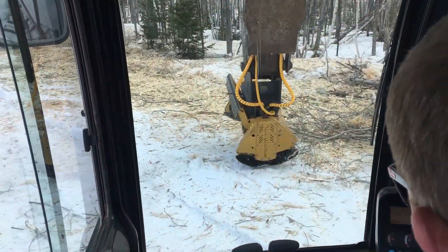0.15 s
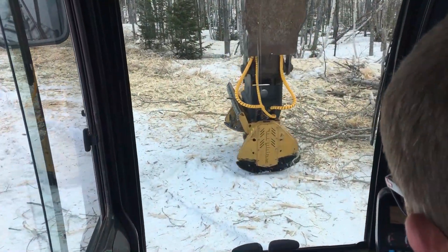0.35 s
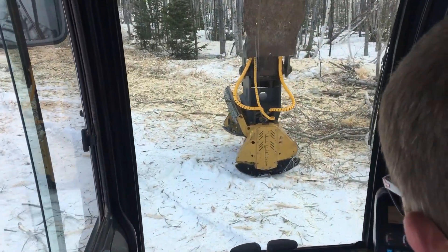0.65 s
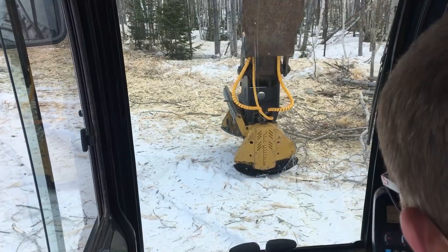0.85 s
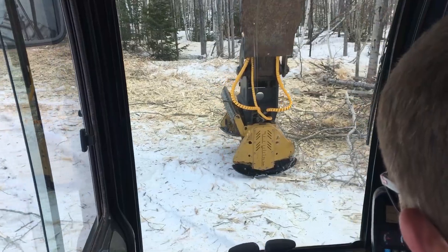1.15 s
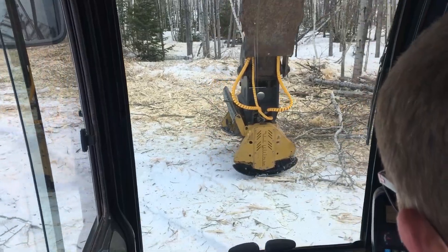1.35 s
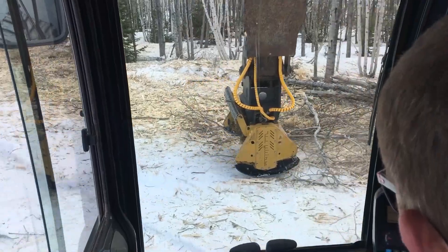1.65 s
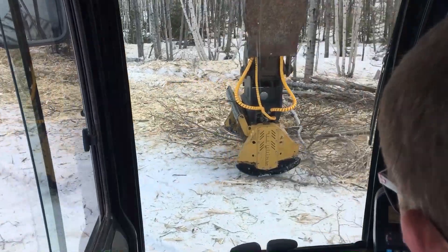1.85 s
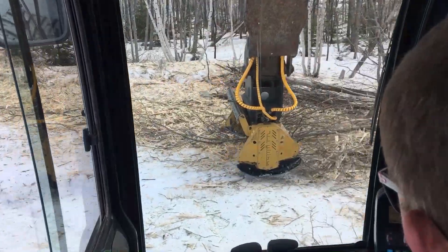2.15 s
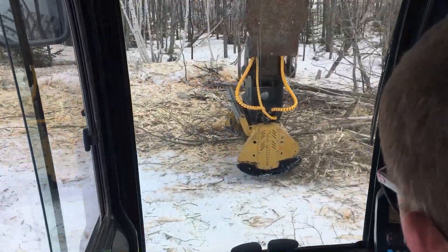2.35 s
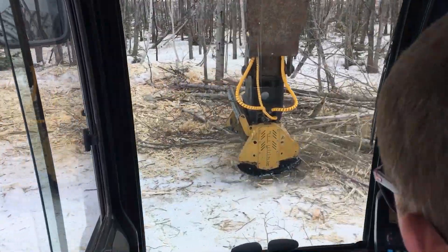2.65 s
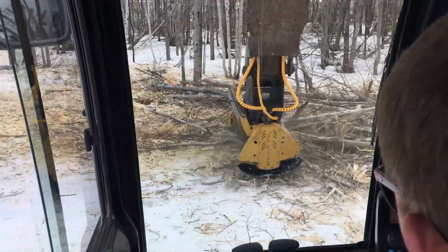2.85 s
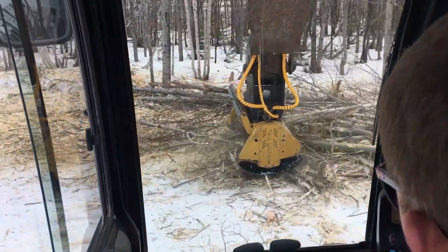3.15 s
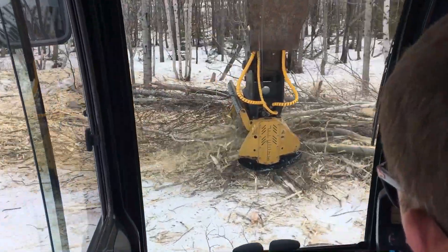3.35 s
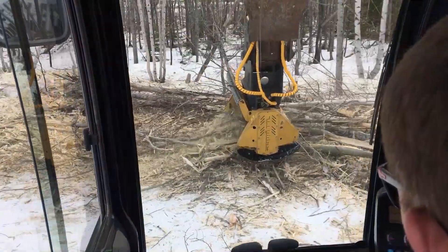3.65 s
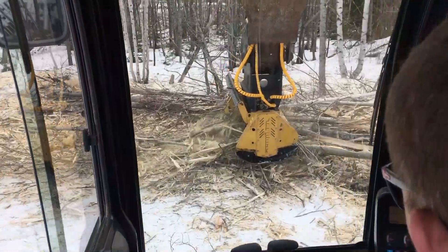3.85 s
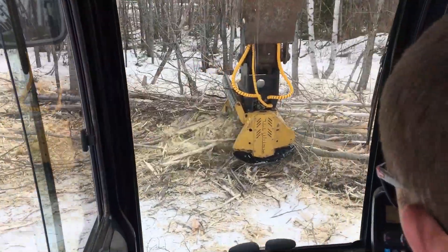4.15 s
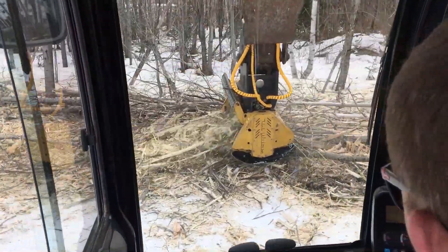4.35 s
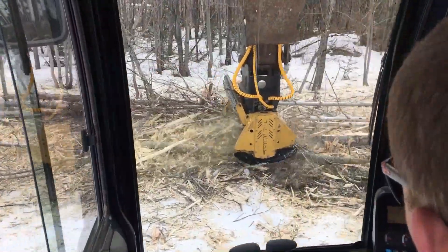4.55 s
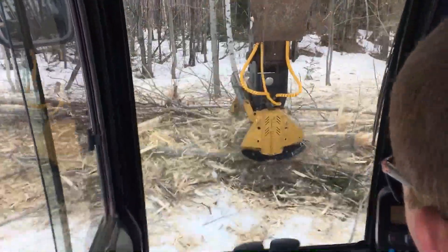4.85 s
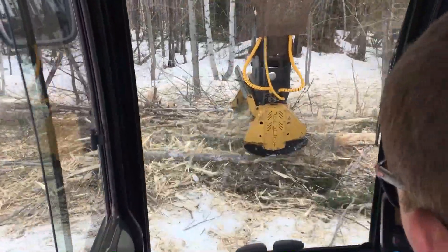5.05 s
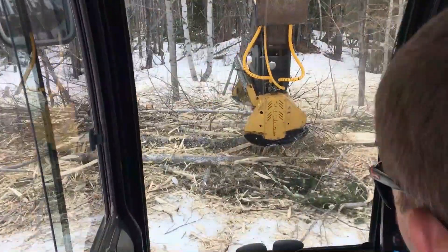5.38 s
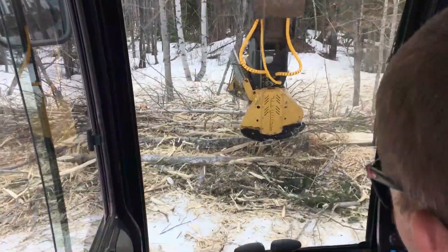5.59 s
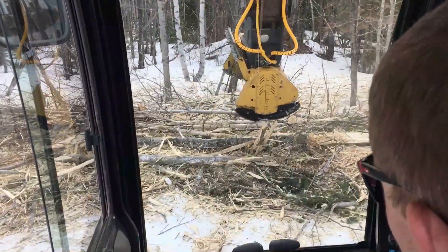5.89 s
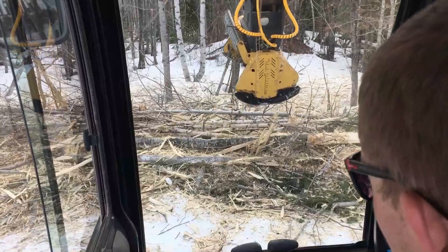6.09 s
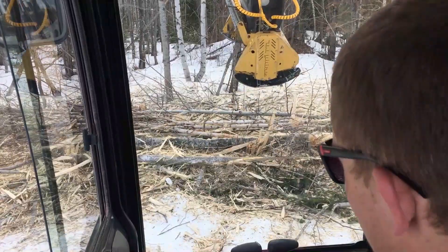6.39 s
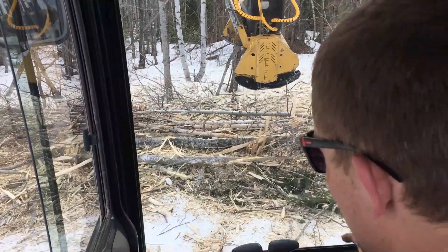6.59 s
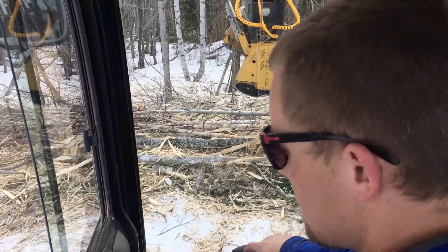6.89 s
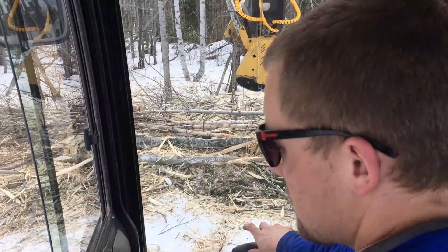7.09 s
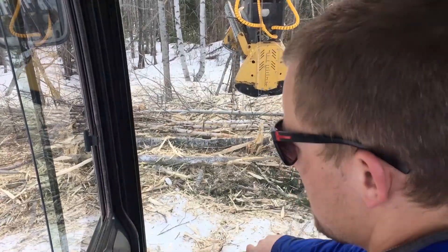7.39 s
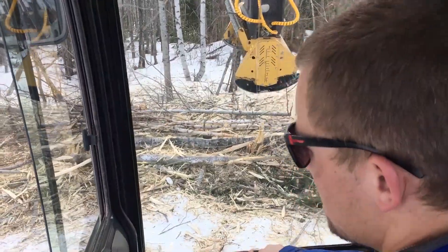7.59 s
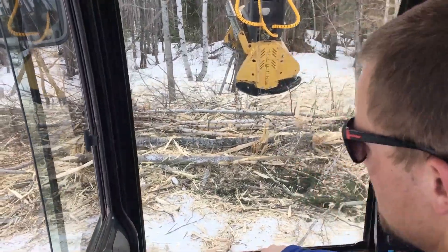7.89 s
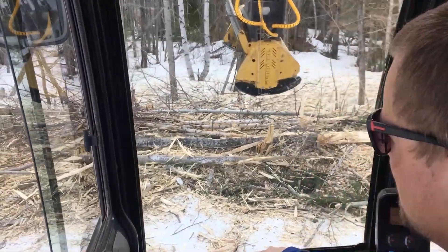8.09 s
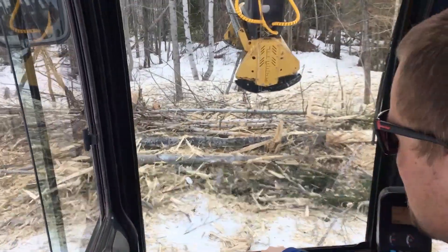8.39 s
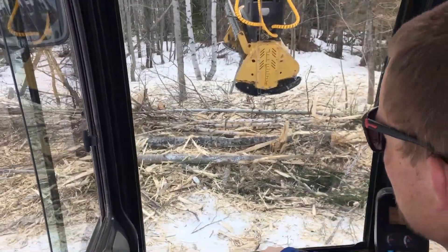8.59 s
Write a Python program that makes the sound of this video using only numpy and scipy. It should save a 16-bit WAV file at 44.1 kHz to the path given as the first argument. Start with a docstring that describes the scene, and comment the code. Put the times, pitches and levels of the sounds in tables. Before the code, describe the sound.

Inside an excavator cab, a diesel engine booms low while a mulcher head outside cracks and shreds brush, then stops as loose fittings rattle.

```python
"""A diesel engine booms in the cab of an excavator sweeping a mulcher head through brush; heard from the seat.
The engine is harmonics of its firing rate, which sags under load, plus weaker crankshaft and pump lines.
Out beyond the glass, teeth shred wood: dense random cracks and hard chops, dulled and ringing in steel.
Hydraulics whine, whistle and hiss; filtered noise rocks the cab at each jolt and drones in its panels.
Close by are sharp ticks made of short decaying sines, and rattles, knocks and a squeak."""
import sys
import numpy as np
from scipy import signal
from scipy.fft import rfft, irfft, next_fast_len
from scipy.io import wavfile
from scipy.ndimage import map_coordinates

SR = 44100
rng = np.random.default_rng(int(sys.argv[2]) if len(sys.argv) > 2 else 0)


def unload_wav(signal):
    """Save mono or channel-first audio to the path in sys.argv[1] as 16-bit WAV at rate SR, clipped to [-1, 1]."""
    wavfile.write(
        sys.argv[1],
        SR,
        np.round(np.clip(np.atleast_2d(signal).T, -1, 1) * 32767).astype(np.int16),
    )


N = 384993


def amp(db):
    """Decibels to gain."""
    return 10 ** (np.asarray(db) / 20)


def unit(x):
    """Scale to rms 1."""
    return x / np.sqrt(np.mean(x ** 2) + 1e-20)


def curves(rows):
    """One value per sample for each column after the time."""
    s, *columns = np.transpose(rows)
    return [np.interp(np.arange(N) / SR, s, column) for column in columns]


def wobble(rate):
    """A smooth random curve, rate knots a second."""
    knots = rng.standard_normal(4096)
    coarse = np.arange(0, N + 64, 64)
    values = map_coordinates(knots, [coarse * rate / SR], mode="wrap")
    return np.interp(np.arange(N), coarse, values)


def filtered(x, response):
    """Multiply the spectrum of x by a complex response of frequency."""
    m = next_fast_len(N + SR // 4)  # spare room for the ringing
    return irfft(rfft(x, m) * response(np.fft.rfftfreq(m, 1 / SR)), m)[:N]


def colour(points):
    """Response through (frequency [Hz], level [dB]) points on a log frequency axis."""
    f, db = np.transpose(points)
    return lambda hz: amp(np.interp(np.log(hz + 1), np.log(f), db))


def body(modes):
    """Causal response of resonances with alternating sign: (centre [Hz], width [Hz], level [dB])."""
    def response(f):
        total = 0
        for k, (centre, width, db) in enumerate(modes):
            damping = 1j * f * width
            total = total + (-1) ** k * amp(db) * damping / (centre * centre - f * f + damping)
        return total
    return response


def noise(response):
    """Noise of rms 1 with the given response."""
    return unit(filtered(rng.standard_normal(N), response))


def tone(hz):
    """A sine of rms 1 that follows a frequency curve."""
    return np.sqrt(2) * np.sin(2 * np.pi * (np.cumsum(hz) / SR + rng.random()))


def bursts(times, levels_db, attack, t60):
    """Envelope of blows that rise quickly and die away by 60 dB in about t60 seconds."""
    out, t = np.zeros(N + 2 * SR), np.arange(SR) / SR
    shape = (1 - np.exp(-t / attack)) * np.exp(-np.log(1000) * t / t60)
    for s, db in zip(times, levels_db):
        out[round(s * SR):][:len(t)] += amp(db) * shape / shape.max()
    return out[:N]


def swells(rows, attack_s, release_s):
    """Envelope of (start [s], length [s], level [dB]) rows: a smooth rise, a hold, a fade after the end."""
    t = np.arange(N) / SR
    envelope = np.zeros(N)
    for start, length, db in rows:
        rise = np.sin(np.pi / 2 * np.clip((t - start) / attack_s, 0, 1)) ** 2
        fade = np.exp(-np.maximum(t - start - length, 0) / release_s)
        envelope += amp(db) * rise * fade
    return envelope


def lines(shaft_hz, orders, waver_db, waver_rate):
    """Tones locked to a shaft, each wavering in strength."""
    return sum(amp(db + waver_db * wobble(waver_rate)) * tone(order * shaft_hz) for order, db in orders)


def machine_hiss(firing_hz, level_db, depth=0.043, ring_db=-5):
    """Fan and oil noise with a few narrow resonances, pulsing slightly with each firing."""
    # spectrum of the rush: (frequency [Hz], level [dB per Hz])
    hiss_spectrum = [(500, -16), (1200, -2), (1700, -5), (2300, -1), (3200, -3), (3900, -7), (5000, -14.5),
                     (6300, -21.5), (7600, -26), (10400, -29.5), (11800, -26), (15500, -31)]
    # resonances in the hiss: (centre [Hz], width [Hz], level [dB])
    machine_modes = [(1590, 90, -2), (1865, 50, 0), (2100, 60, 0), (2250, 60, -1), (2645, 70, 4),
                     (3470, 200, -4)]
    ringing = noise(lambda hz: body(machine_modes)(hz) * colour(hiss_spectrum)(hz))
    rush = noise(colour(hiss_spectrum)) + amp(ring_db) * ringing
    pulsing = unit((1 + depth * tone(firing_hz)) * rush)
    return amp(level_db + 1.1 * wobble(25)) * pulsing


def cab(groan_db, groan_to_panels_db=-27, boom_follows=0.45, drone_follows=0.2):
    """The cab rocks after each jolt and booms a little more; its panels drone with machine and groaning head."""
    # jolts that rock the cab on its mounts: (time [s], level [dB])
    jolts = [(.78, -24.5), (3.1, -25.5), (3.97, -21.5), (4.88, -19), (5.09, -17), (5.33, -23.5),
             (6.301, -36), (6.72, -17), (7.58, -24), (7.95, -21), (8.2, -17), (8.471, -19.5)]
    # spectra of rocking cab, booming air and droning panels: (frequency [Hz], level [dB per Hz])
    shake_spectrum = [(14, -49), (22, -22), (32, -4.5), (45, 1.5), (62, -3), (90, -5), (140, -19),
                      (300, -50), (600, -100)]
    boom_spectrum = [(25, -32.5), (55, -13), (85, 4.5), (120, 0.5), (165, 1.5), (210, -3.5), (270, -10.5),
                     (340, -18), (450, -23), (800, -69.5)]
    drone_spectrum = [(100, -1.5), (250, 17), (390, 10), (500, 5), (760, 3.5), (1000, -1), (1400, -9),
                      (2000, -18), (5000, -57)]
    shake_db, boom_db, drone_db = -28, -27, -36  # steady levels between jolts
    s, jolt_db = np.transpose(jolts)
    rocking = np.hypot(1, bursts(s, jolt_db - shake_db, attack=.05, t60=.75))
    shake = amp(shake_db) * rocking * noise(colour(shake_spectrum))
    boom = amp(boom_db) * rocking ** boom_follows * noise(colour(boom_spectrum))
    drone_level = amp(drone_db + 0.81 * wobble(5)) * rocking ** drone_follows
    drone_level = drone_level + amp(groan_db + groan_to_panels_db)
    return shake + boom + drone_level * noise(colour(drone_spectrum))


def drive(start, length, db, full_hz):
    """A hydraulic drive's whine climbs in pitch and level as it spins up."""
    spin_up_s, spin_up_share = .3, .075  # it starts this share below its full pitch
    age = np.maximum(np.arange(N) / SR - start, 0)
    hz = full_hz * (1 - spin_up_share * np.exp(-(age / spin_up_s) ** 2))
    level = swells([(start, length, db)], attack_s=0.71, release_s=.09)
    return level * amp(0.42 * wobble(27)) * tone(hz)


def hydraulics():
    """The drives whine; oil whistles and hisses through the valves."""
    # drives as the boom swings and lifts: (start [s], length [s], level [dB], pitch at full speed [Hz])
    drives = [(0.848, 1.2, -38, 534), (5.852, .42, -41.5, 688), (7.798, 0.42, -44, 688)]
    # valve whistles: (start [s], length [s], level [dB], pitch [Hz])
    whistles = [(.15, 0.23, -50, 2284), (1.2, 0.15, -52, 2370), (2.115, 0.33, -50, 2375)]
    # oil hiss as the boom is lowered: (start [s], length [s], relative level [dB])
    lowering = [(-0.12, .5, -56)]
    # thin hiss of a throttling valve through the cut, with short spurts: (start [s], length [s], level [dB])
    valve = [(1.75, 5, -71), (2.18, .05, -74), (2.37, .65, -63), (3.1, 2, -70.5), (5.57, 0.067, -62.5)]
    # resonances of rushing oil: (centre [Hz], width [Hz], level [dB])
    oil_modes = [(2270, 120, 0), (4200, 130, -3), (5060, 110, -4), (5260, 120, 0)]
    # spectra of oil and throttling valve: (frequency [Hz], level [dB per Hz])
    oil_spectrum = [(1500, -16.5), (2300, 6.5), (3300, 4), (4200, -4), (4700, -2.5), (5250, -5.5),
                    (5700, -3.5), (8000, -15.5), (15000, -25)]
    throttle_spectrum = [(8000, -43), (10800, -18.5), (11600, 5.5), (12400, 3), (13200, -7), (15500, -25.5)]

    whine = sum(drive(*row) for row in drives)
    whistle = np.zeros(N)
    for *row, hz in whistles:
        whistle += swells([row], attack_s=.12, release_s=.05) * tone(hz + 12 * wobble(120))
    rush = noise(body(oil_modes)) + amp(4.5) * noise(colour(oil_spectrum))
    oil = swells(lowering, attack_s=.05, release_s=0.082) * rush
    spurts = swells(valve, attack_s=.05, release_s=.08) * amp(1.5 * wobble(14))
    throttle = spurts * noise(colour(throttle_spectrum))
    return whine + amp(2.1 * wobble(40)) * whistle + oil + throttle


def rattles():
    """Loose fittings chatter and scrape, a panel knocks, something squeaks."""
    # loose cab fittings: (time [s], rattle level [dB], relative level of the high scrape [dB])
    loose_fittings = [(7, -41.5, -48), (7.106, -44, -44.5), (7.927, -38, -73), (8.029, -40.5, -59),
                      (8.204, -40.5, -54.5), (8.3, -40.5, -60), (8.35, -42.5, -60), (8.493, -39, -46.5),
                      (8.617, -38.5, -57.5), (8.694, -44, -63)]
    # knocks on a cab panel: (time [s], level [dB])
    knocks = [(7.928, -33.5), (8.029, -35.5), (8.248, -41.5), (8.663, -41)]
    # a short squeak in the cab: (start [s], length [s], level [dB])
    squeaks = [(8.424, .016, -40.5)]
    # resonances of the panel: (centre [Hz], width [Hz], level [dB])
    panel_modes = [(985, 60, 6.5), (1214, 110, -2), (1554, 110, -10)]
    # spectra of chatter and scrape: (frequency [Hz], level [dB per Hz])
    fittings_spectrum = [(500, -18.5), (2000, -3.5), (3200, 3.5), (4500, -9), (7000, -39), (15000, -46.5)]
    scrape_spectrum = [(1500, -13), (5500, 2.5), (8000, -7.5), (12000, -10.5), (15500, -12)]

    s, rattle_db, scrape_db = np.transpose(loose_fittings)
    chatter = bursts(s, rattle_db, attack=0.0025, t60=0.075) * noise(colour(fittings_spectrum))
    scrape = bursts(s, scrape_db, attack=.003, t60=.09) * noise(colour(scrape_spectrum))
    panel = noise(lambda hz: body(panel_modes)(hz) * colour([(1600, 0), (6000, -24)])(hz))
    knock = bursts(*np.transpose(knocks), attack=0.0015, t60=0.24) * panel
    squeak_hz = 3120 + 50 * wobble(300)
    squeak_tone = tone(squeak_hz) + amp(-19.0) * tone(2 * squeak_hz)
    squeak = swells(squeaks, attack_s=.006, release_s=0.0088) * squeak_tone
    return chatter + knock + amp(-2.5) * scrape + squeak


def ticks(cycles=15, snap_t60=0.0046, snap=0.5):
    """Very short, hard contacts close by: a snap of noise and a ring that dies by 60 dB in a few cycles."""
    # sharp ticks at the cab: (time [s], level before the filter [dB], ring [Hz])
    contacts = [(0.964, -41, 7300), (1.563, -48, 7600), (1.864, -43, 7500), (2.465, -43, 7500),
                (2.55, -37.5, 7500), (4.961, -9, 3200), (5.5926, -13.5, 3080), (5.918, -26.5, 7040),
                (6.964, -42, 7500), (8.3258, -11.5, 3080), (8.4797, -13.5, 3380)]
    out, t = np.zeros(N + SR), np.arange(SR // 20) / SR
    for s, db, hz in contacts:
        ring = np.sin(2 * np.pi * hz * t) * np.exp(-np.log(1000) * t * hz / cycles)
        crack = snap * rng.standard_normal(len(t)) * np.exp(-np.log(1000) * t / snap_t60)
        out[round(s * SR):][:len(t)] += amp(db) * (ring + crack)
    return filtered(out, colour([(1000, -24), (2500, 0), (7500, -3), (11000, -11), (15000, -19)]))


def splinters(per_s, spread_db):
    """Dense cracks of uneven size on a bed of tearing noise, rms 1."""
    struck = rng.random(N) < per_s / SR
    cracks = struck * rng.standard_normal(N) * amp(spread_db * rng.standard_normal(N))
    return unit(unit(cracks) + rng.standard_normal(N))


def chopping(bite_db):
    """Envelope of the hard chops and of lighter random ones that follow the bite."""
    # the hardest blows of the teeth on stems: (time [s], relative peak level [dB])
    chops = [(2.12, -26), (2.208, -29.5), (2.624, -25), (2.705, -21.5), (2.825, -19.5), (2.891, -22),
             (3.085, -20), (3.334, -18), (3.399, -17), (3.459, -17.5), (3.494, -22), (3.889, -26.5),
             (4.118, -19), (4.15, -20.5), (4.801, -20), (4.847, -30.5), (5.263, -22), (5.526, -24.5)]
    twigs_per_s, twig_db, twig_spread_db = 10, 2.5, 5.5  # levels relative to the bite
    count = int(twigs_per_s * N / SR)
    chance = rng.random((count, 2))
    at = (chance[:, 0] * N).astype(int)
    twig_levels = bite_db[at] + twig_db + twig_spread_db * (2 * chance[:, 1] - 1)
    twigs = np.column_stack([at / SR, twig_levels])
    return bursts(*np.vstack([chops, twigs]).T, attack=0.004, t60=0.098)


def mulcher(bite_db, groan_hz, groan_db, ragged_db=2, ring_db=0.5):
    """Splintering wood and single chops ring in the steel head; a thick trunk makes it groan and thud."""
    # shredded wood, dulled by the glass: (frequency [Hz], level [dB per Hz])
    wood_spectrum = [(250, -30), (600, 0), (1000, 1.5), (1450, -3.5), (2000, 1), (2700, -1), (3700, -3),
                     (4400, -9), (5500, -15), (7500, -26.5), (10500, -30), (14000, -46), (16000, -32.5)]
    # resonances of the steel head: (centre [Hz], width [Hz], level [dB])
    head_modes = [(1018, 70, 0), (1876, 60, -1), (2105, 60, 0), (2215, 60, -1), (2355, 70, -4),
                  (2642, 60, 3), (2920, 60, -5), (3250, 250, -6), (3800, 160, -5), (4560, 160, -3),
                  (6690, 140, -3)]
    # heavy wood knocking on the head: (time [s], level [dB])
    heavy_knocks = [(4.56, -28), (4.61, -33), (4.85, -32), (4.925, -25), (4.965, -29.5), (5.04, -36)]
    # resonances of those knocks: (centre [Hz], width [Hz], level [dB])
    thud_modes = [(145, 50, 2.5), (340, 61, 5.5), (510, 80, -2), (690, 110, 0)]

    flow = amp(bite_db) * unit(amp(ragged_db * wobble(75) + 0.83 * wobble(36)))
    chops = chopping(bite_db)
    wood = unit(filtered(splinters(per_s=1500, spread_db=-0.5), colour(wood_spectrum)))
    steel_response = lambda hz: body(head_modes)(hz) * colour(wood_spectrum)(hz)
    steel = unit(filtered(splinters(per_s=1200, spread_db=4.5), steel_response))
    # chops go mostly into the steel
    shredding = (flow + amp(-20.0) * chops) * wood + (amp(ring_db) * flow + amp(-12) * chops) * steel
    thud_noise = noise(lambda hz: body(thud_modes)(hz) * colour([(700, 0), (3000, -30)])(hz))
    thuds = bursts(*np.transpose(heavy_knocks), attack=0.0064, t60=0.14) * thud_noise
    return amp(-3.5) * shredding + thuds + amp(groan_db - 1.5) * tone(groan_hz)


def engine(firing_hz, uneven_db=1.35, jitter_hz=0.63):
    """Load, read from the droop in speed, strengthens the fundamental and quietens the pump's hum."""
    # the second harmonic booms in long stretches with short breaks: (start [s], length [s], level [dB])
    pulls = [(-.2, 0.86, -16), (.83, 0.61, -19.5), (1.48, 1.74, -27), (3.08, .8, -16), (4.08, 2.55, -17.5),
             (6.68, 2.52, -18)]
    # the third harmonic swells while the arm moves: (start [s], length [s], level [dB])
    arm_swells = [(.8, 0.94, -41.5), (4.3, 1.5, -35), (5.4, 0.77, -30.5)]
    # weaker engine lines: (multiple of the crankshaft speed, level [dB])
    crank_orders = [(4.5, -35), (8, -50.5), (12, -44.5), (13, -49), (14.2, -51.5), (18, -48.5), (21, -54),
                    (28, -61.5)]
    # lines of the hydraulic hum: (multiple of the crankshaft speed, relative level [dB])
    pump_orders = [(1, -10.5), (4, 0.5), (7.15, 3.5), (8, -19.5), (12, -14.5), (14.2, -19.5),
                   (20.55, -26.5), (24, -18.5)]
    free_hz, loaded_hz = 99.8, 95.2  # the governor lets the firing rate droop to full load
    first_free_db, first_loaded_db, third_db = -29.5, -21, -36.5  # the third has a steady base
    pump_free_db, pump_loaded_db = -31.5, -47.5  # gain on the pump lines

    load = np.clip((free_hz - firing_hz) / (free_hz - loaded_hz), 0, 1)
    first = amp(first_free_db + (first_loaded_db - first_free_db) * load)
    second = swells(pulls, attack_s=0.13, release_s=0.047)
    third = amp(third_db) + swells(arm_swells, attack_s=0.39, release_s=.25)
    # no two firings are quite alike in strength or timing
    running_hz = firing_hz + jitter_hz * wobble(30)
    boom = np.zeros(N)
    for k, strength in enumerate((first, second, third), 1):
        boom += strength * amp(uneven_db * wobble(28)) * tone(k * running_hz)
    crank_hz = firing_hz / 3  # three firings a turn
    pump_db = pump_free_db + (pump_loaded_db - pump_free_db) * load ** 2
    pump = amp(pump_db) * lines(crank_hz, pump_orders, waver_db=2.33, waver_rate=8.4)
    return boom + pump + lines(crank_hz, crank_orders, waver_db=2.36, waver_rate=7)


def scene(hiss_per_bite_db=-9):
    """All sources as heard from the seat; the machine hisses harder as the teeth bite."""
    # engine speed: (time [s], firing rate [Hz])
    firing = [(0, 95.9), (.45, 97.4), (.65, 96.9), (.9, 98.1), (1.35, 98.5), (1.75, 99.7), (2.98, 98.9),
              (3.22, 95.3), (3.8, 96), (4.15, 97.6), (5.1, 95.7), (6.05, 97.1), (6.52, 95.3), (6.75, 97.4),
              (7.05, 96.1), (7.6, 96), (7.9, 96.9), (8.73, 96.5)]
    # how hard the teeth bite into the wood: (time [s], relative level [dB])
    bite = [(1.3, -66), (1.7, -50.5), (2.45, -46), (2.65, -37), (3.05, -34), (3.85, -35), (4.55, -31),
            (5.1, -35), (5.7, -41), (6.05, -54.5)]
    # the head groans in a trunk: (time [s], pitch [Hz], relative level [dB])
    groan = [(4.35, 102, -70), (4.47, 101.6, -20.5), (4.56, 102.5, -9.5), (4.62, 101.3, -6.3),
             (4.69, 94, -10.5), (4.76, 94, -18), (4.9, 94.7, -70)]
    firing_hz, = curves(firing)
    bite_db, = curves(bite)
    groan_hz, groan_db = curves(groan)
    steady_hiss_db = -48
    hiss_db = 20 * np.log10(np.hypot(amp(steady_hiss_db), amp(bite_db + hiss_per_bite_db)))
    background = machine_hiss(firing_hz, hiss_db) + cab(groan_db) + hydraulics()
    close_by = rattles() + ticks()
    return (background + close_by + mulcher(bite_db, groan_hz, groan_db) + engine(firing_hz))[None]


def record(dry):
    """The ends open and close softly; nothing is kept above the microphone's band limit."""
    top_hz = 15680
    ends = signal.windows.tukey(N, .001)
    return filtered(dry[0] * ends, lambda hz: hz < top_hz)[None]


dry = scene()
out = record(dry)
unload_wav(out)
```